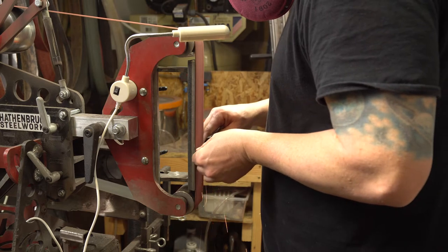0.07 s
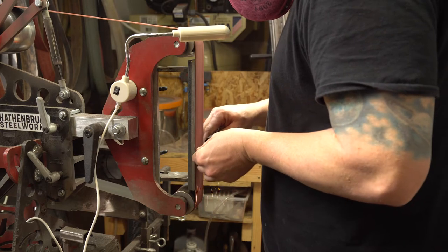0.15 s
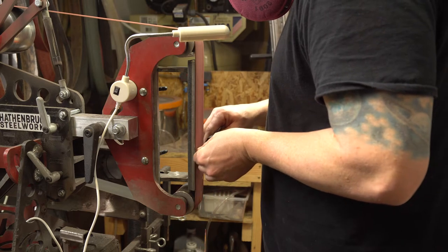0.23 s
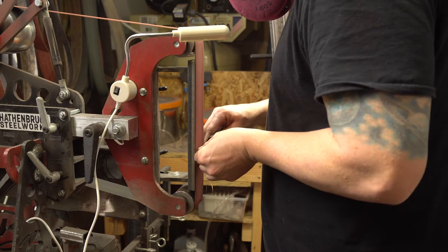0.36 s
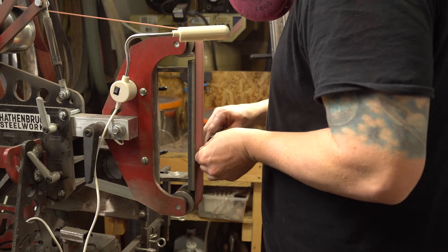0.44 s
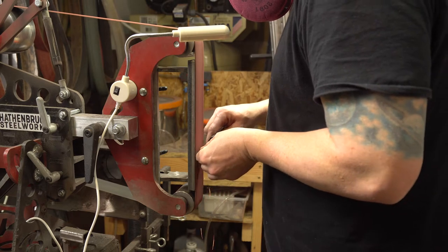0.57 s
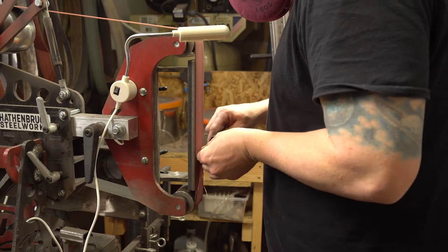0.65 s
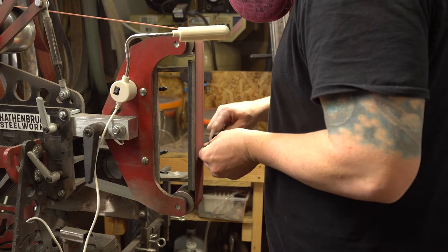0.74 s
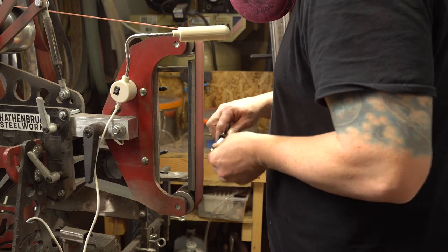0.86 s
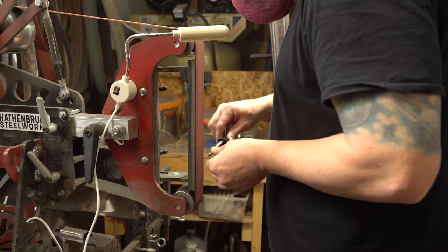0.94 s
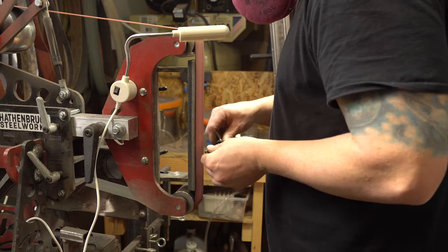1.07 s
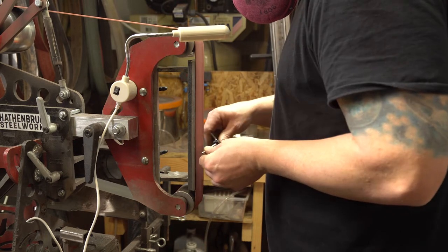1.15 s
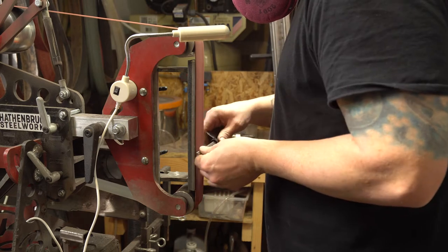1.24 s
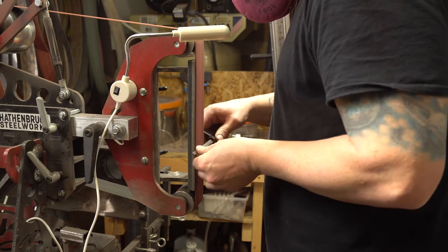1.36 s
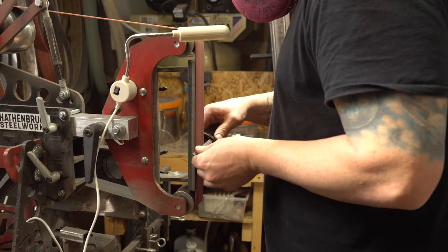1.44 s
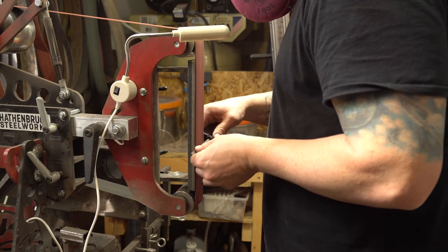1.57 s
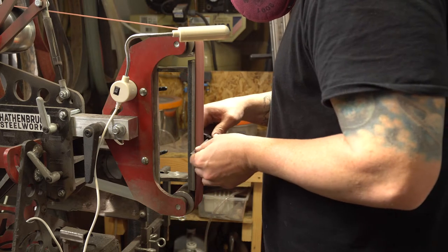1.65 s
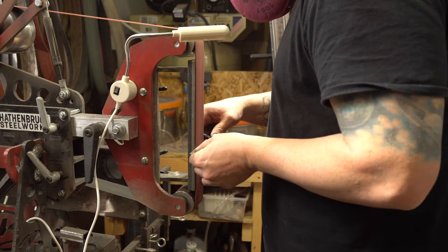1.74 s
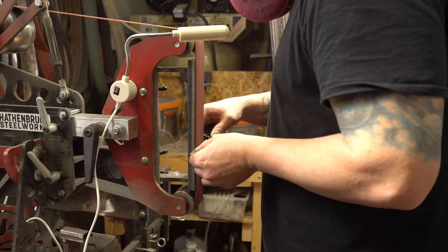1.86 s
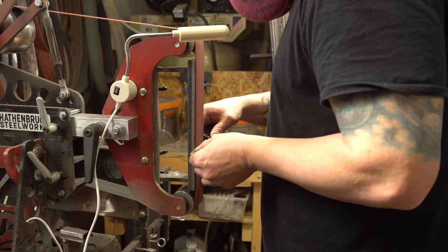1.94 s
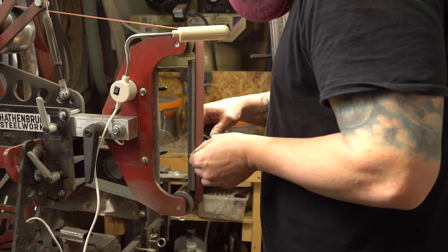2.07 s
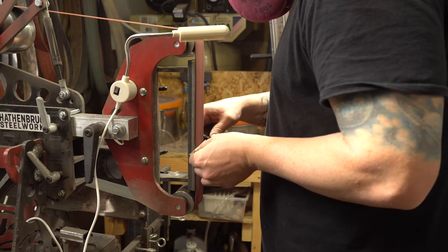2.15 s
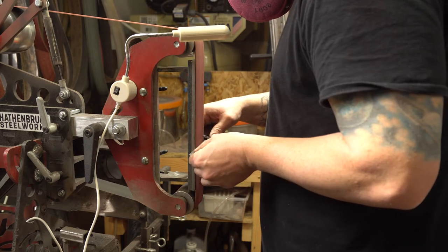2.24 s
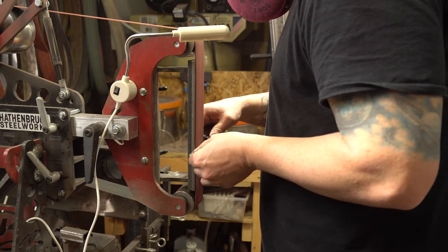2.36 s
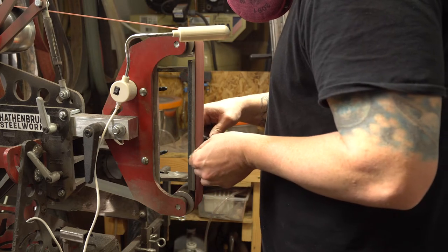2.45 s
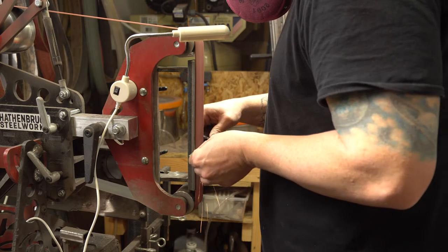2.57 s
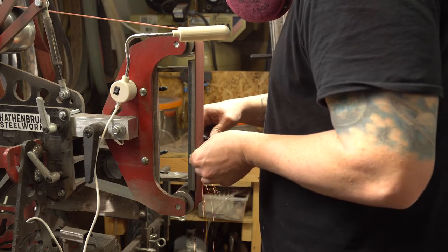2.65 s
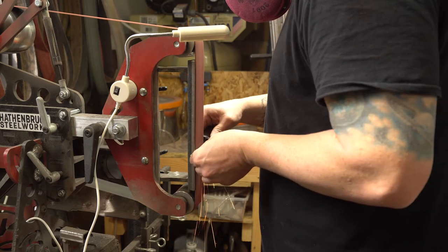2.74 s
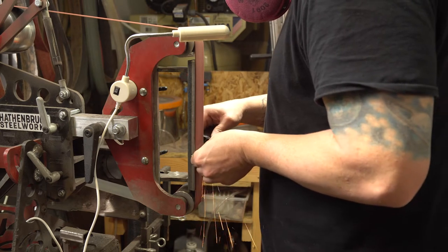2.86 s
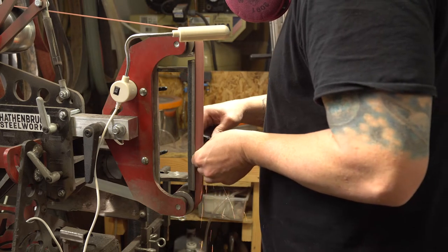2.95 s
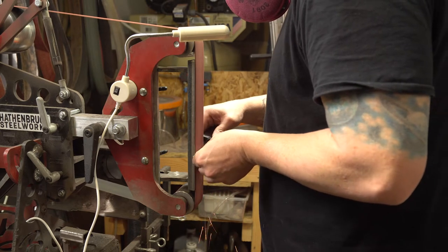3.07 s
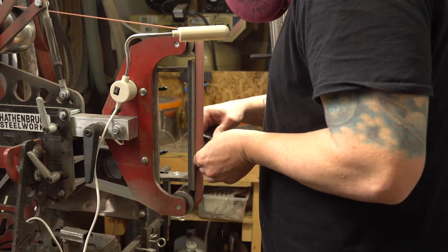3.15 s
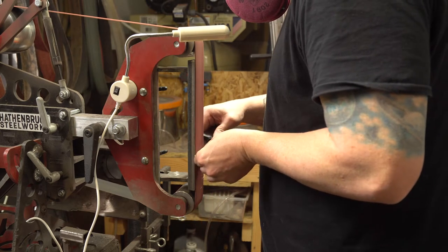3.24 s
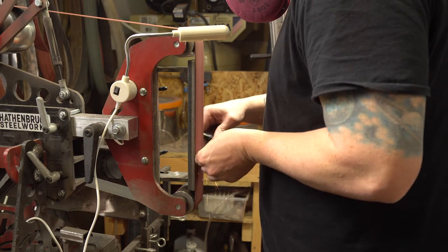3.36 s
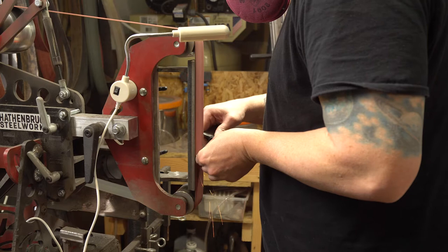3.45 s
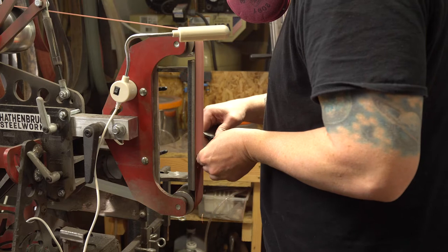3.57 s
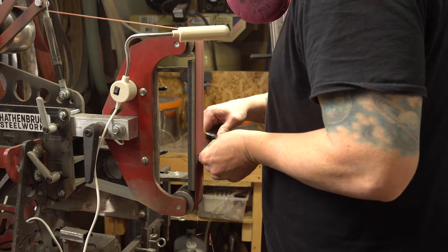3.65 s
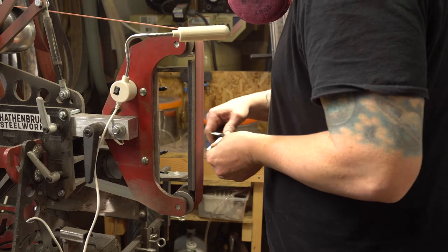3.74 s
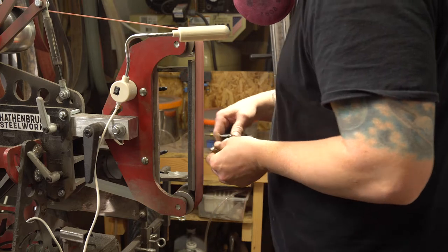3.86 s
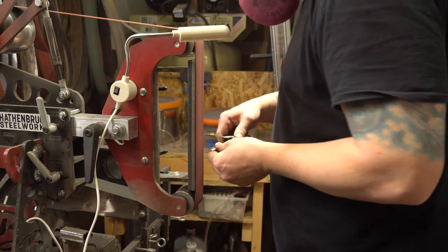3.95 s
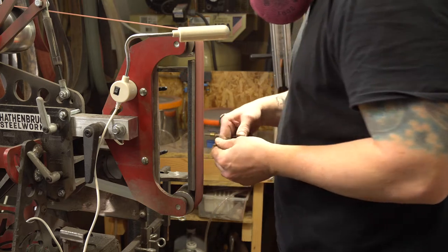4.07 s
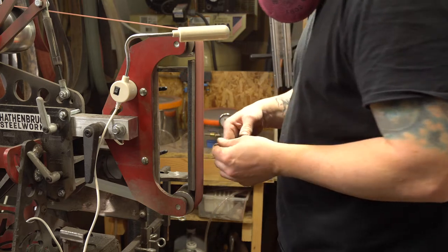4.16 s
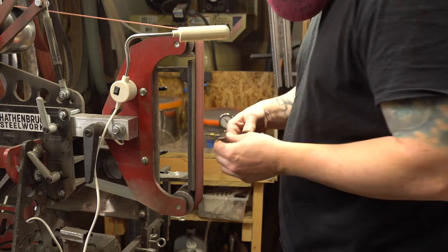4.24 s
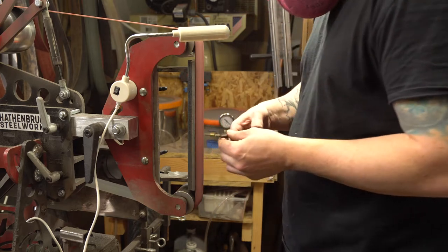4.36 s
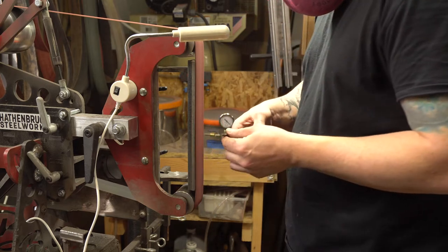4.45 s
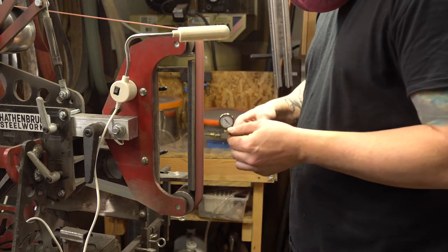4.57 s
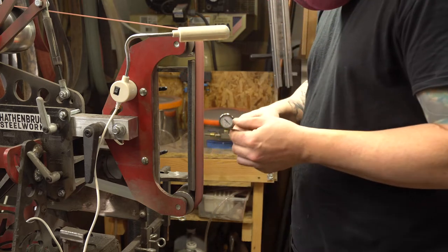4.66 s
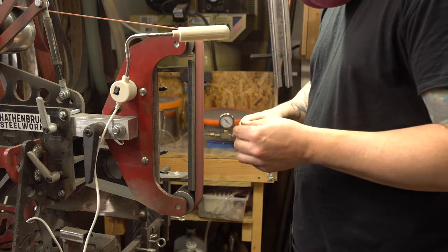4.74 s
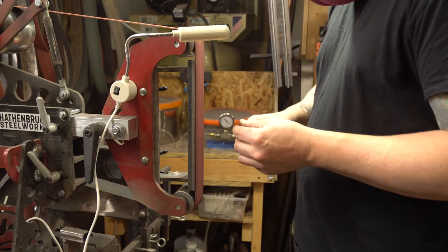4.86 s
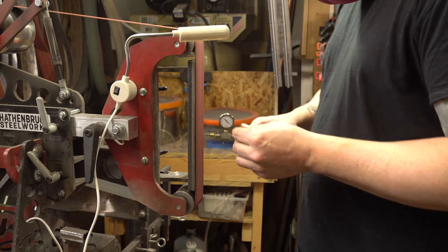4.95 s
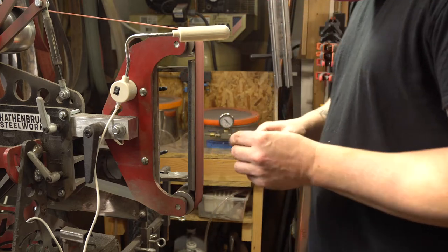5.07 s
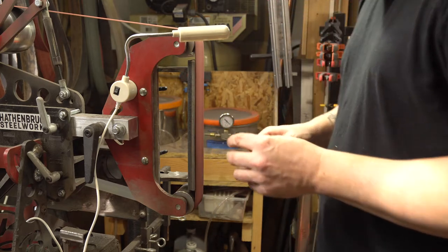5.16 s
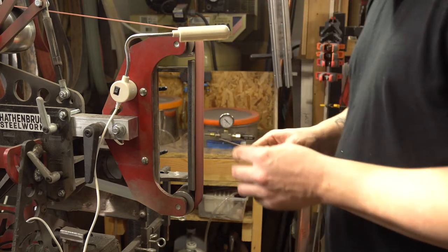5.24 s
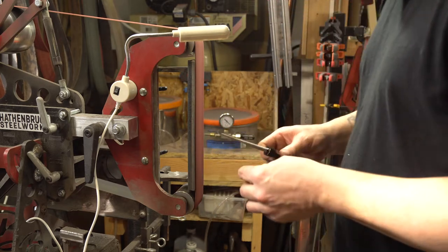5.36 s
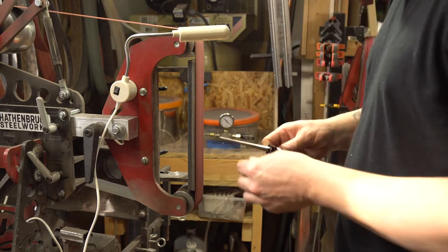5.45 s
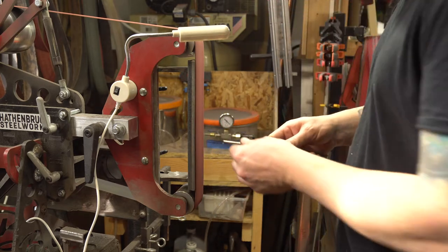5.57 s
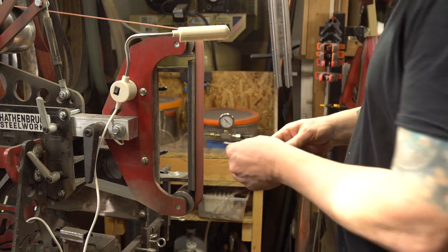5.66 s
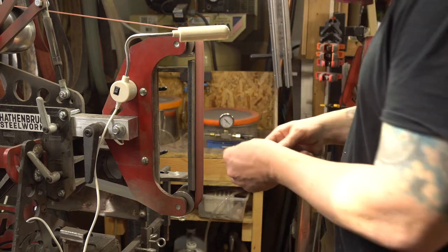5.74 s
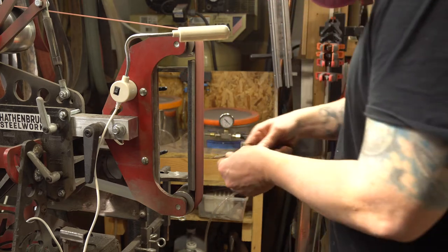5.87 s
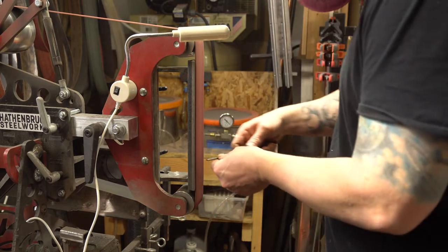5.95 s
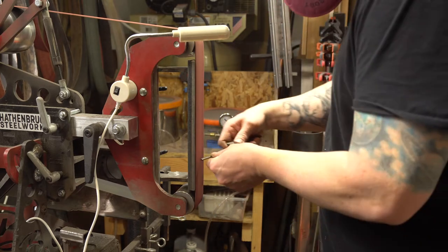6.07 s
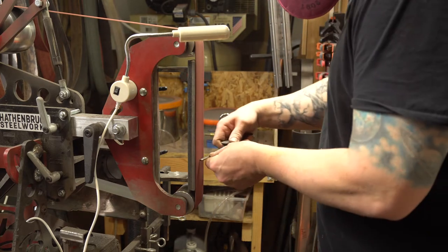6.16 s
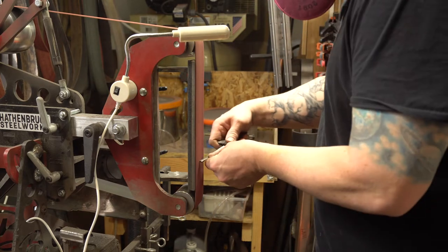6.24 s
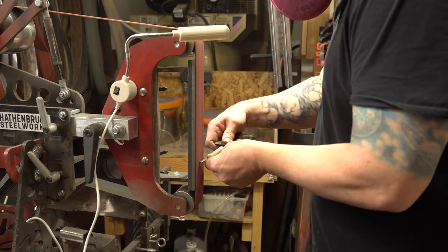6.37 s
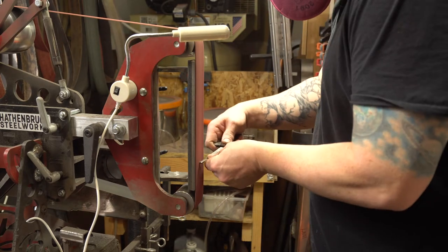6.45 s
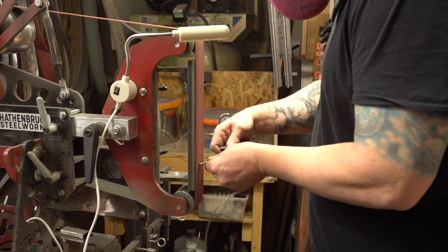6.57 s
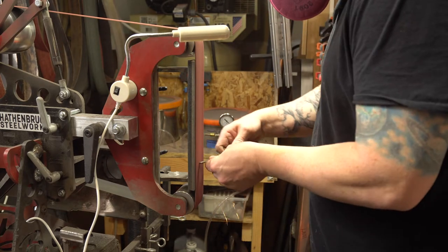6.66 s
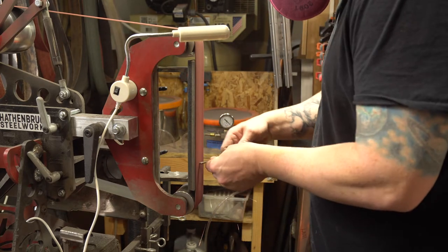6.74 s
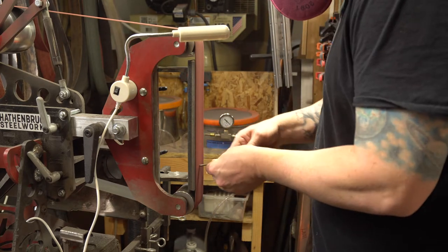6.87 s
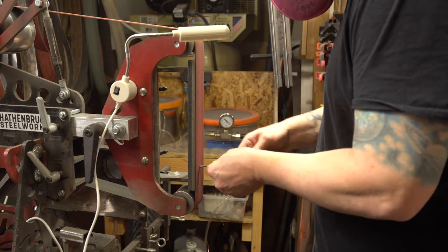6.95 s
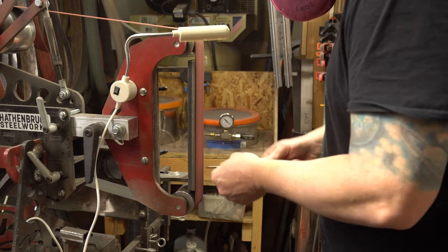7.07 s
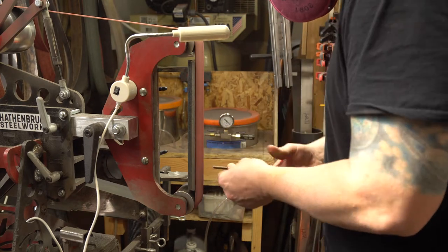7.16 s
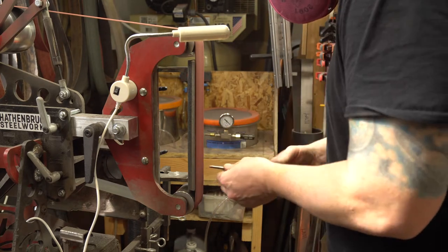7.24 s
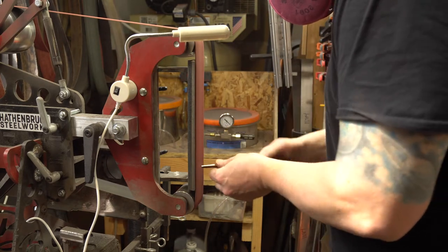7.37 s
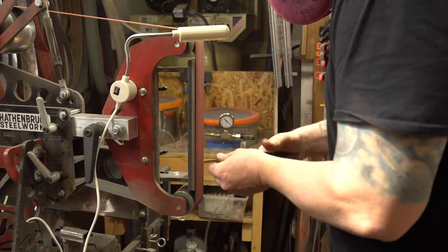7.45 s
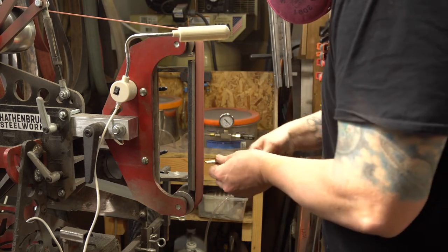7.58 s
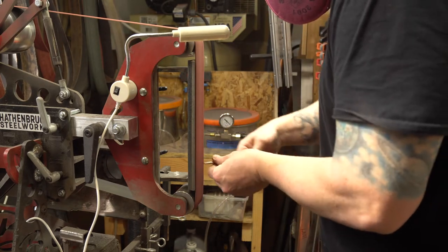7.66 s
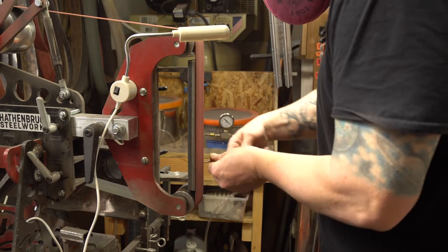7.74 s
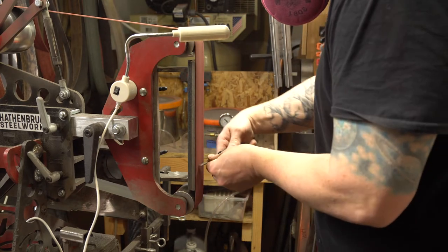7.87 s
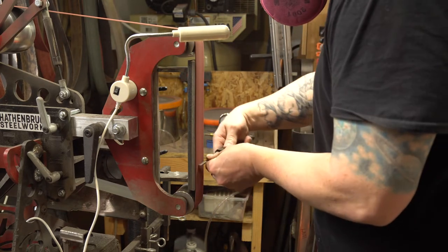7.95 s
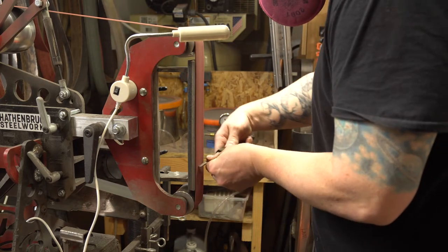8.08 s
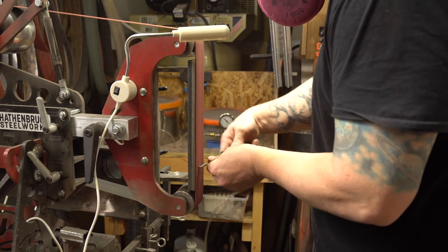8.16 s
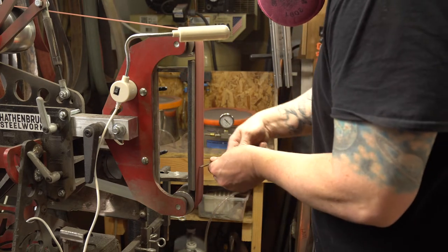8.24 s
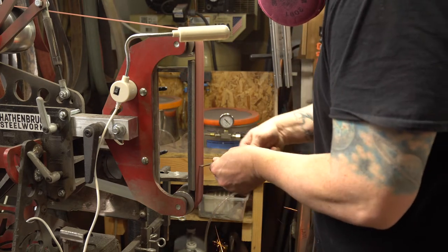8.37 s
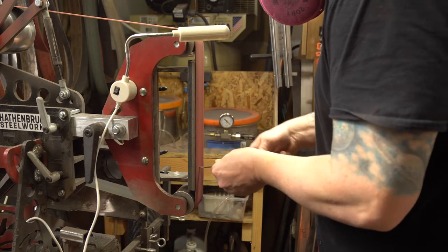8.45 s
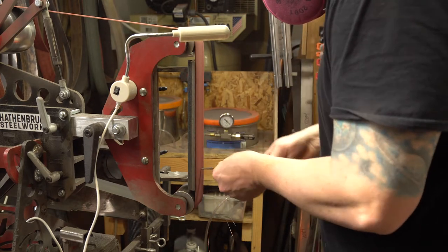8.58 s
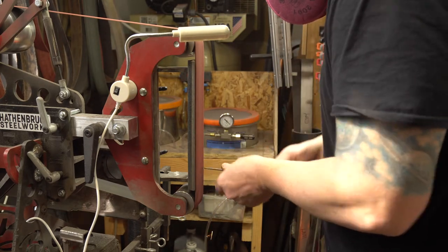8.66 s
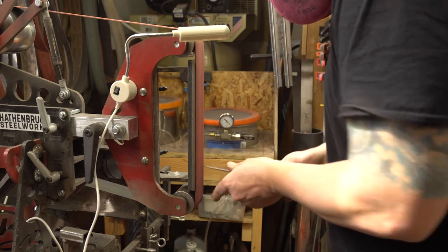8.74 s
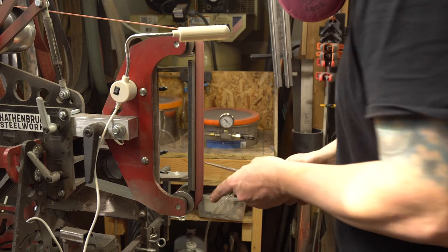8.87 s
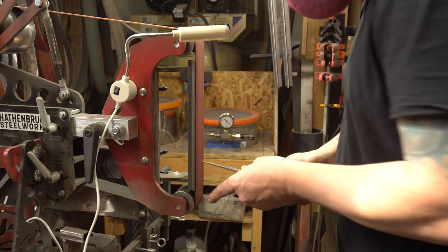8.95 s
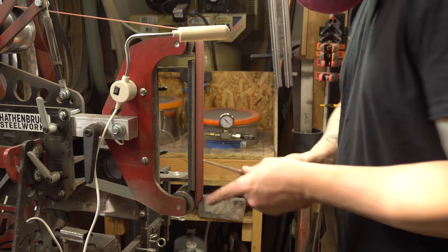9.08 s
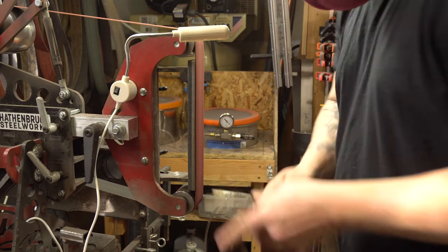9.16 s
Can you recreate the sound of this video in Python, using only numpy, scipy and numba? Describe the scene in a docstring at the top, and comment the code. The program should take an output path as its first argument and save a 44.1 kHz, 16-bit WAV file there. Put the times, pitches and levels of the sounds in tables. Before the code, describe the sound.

A belt grinder runs for the whole nine seconds in a workshop, about a metre away: a whirring rattle that repeats six or seven times a second, over a low hum and an airy hiss. From the very start a steel bar is grinding on the belt, a gritty, flickering, bright scrape that lifts off at 0.8 seconds. At about 1.9 seconds the bar touches again lightly, and the rasp builds, with a low rumble beneath it, until 3.7 seconds. The machine gets slightly faster and louder under the load. It then idles, its hiss taking on a gently sweeping, hollow colour as the worker moves. Two shorter passes follow, from 6.2 to 7.1 seconds and from 7.9 to 8.7 seconds, each swelling and easing, with the steel singing in a high metallic ring over the scrape. The grinder is still running at the end.

```python
"""Steel on a belt grinder

A belt grinder runs in a workshop, about a metre away. The belt's weave and grit come round once a turn
and force the frame into vibration, over the hum of the drive wheel and the hiss of dragged air.
A steel bar is pressed on four times, twice gripped near its tip and twice held far back, where it sings.
Hands and chest shade and reflect the treble, cancelling three bands that move with the worker."""
import sys
import numpy as np
from scipy import signal
from scipy.fft import rfft, irfft, next_fast_len
from scipy.io import wavfile
from scipy.ndimage import uniform_filter1d
from numba import njit

SR = 44100
rng = np.random.default_rng(int(sys.argv[2]) if len(sys.argv) > 2 else 0)


def bounce(signal):
    """Save signal as a 16-bit WAV file at the path given by the first command-line argument."""
    frames = np.transpose(np.atleast_2d(signal))
    limited = np.clip(frames, -1, 1)
    pcm = np.round(limited * 32767).astype(np.int16)
    wavfile.write(sys.argv[1], SR, pcm)


N = 406161

# Modes of the bar for each grip: pitch_hz, width_hz, level_db, db_per_bend, db_per_tilt
TIP_GRIP_MODES = [(413, 53, -26, 7.5, 3), (520, 21, -17, 6.5, 2.5), (663, 47, -17, 8, -1.7),
                  (760, 84, -17, 7, -3.5), (1183, 320, -13, 8, 0), (1690, 250, -11, 3, 1.5),
                  (1996, 100, -12.5, 5, 3.5), (2483, 120, -14, 1.5, -4), (2884, 21, -7, 3, 0.5),
                  (3195, 140, -7, 2.5, 0), (4100, 130, -6.5, 0, 1), (4870, 690, -6, 1.5, -1.5),
                  (8130, 320, -8, 0.2, 2.5), (8960, 90, -7.5, 0, 2), (10250, 520, -8.5, 3.5, 3),
                  (12040, 280, -3.5, 1.5, 2), (12940, 330, -8, -3.5, -1), (13600, 630, -2.5, 1, 0),
                  (15050, 510, -6, 2.5, 2)]
BACK_GRIP_MODES = [(305, 120, -28, 7, -7), (406, 43, -20.5, 5, -1.5), (540, 34, -18.5, 4.5, -0.5),
                   (740, 310, -18, 5, -3), (1733, 53, -6, 6.5, 1.5), (1863, 36, -7.5, 6.5, 1.5),
                   (2012, 52, -7, 5, 0), (2183, 150, -6.5, 5, -0.5), (2530, 560, -8, 8.5, -5),
                   (3223, 180, -6.5, 0, -2), (4915, 220, -3, -0.5, 0.5), (5800, 830, -3.5, 0.5, 1),
                   (6520, 290, -5, 2, 3.5), (7280, 890, -13.5, 6, -8.5), (8500, 230, -11.5, 7.5, -6),
                   (10520, 570, -10.5, 8, 7), (12020, 150, -8, -3, -1.5), (13500, 230, -10.5, 2, -2),
                   (15000.0, 860, -12.5, 0.0, -1)]
# Passes of the bar on the belt: grip, rows of (time_s, pressure_db, bend, tilt)
BAR_PASSES = [("tip", [(0, -15, 1.14, 1), (.2, -14, 0.87, .4), (.46, -12, 0.4, 0.93), (.7, -11.5, 0.15, 1),
              (.805, -10.5, -2.3, 1.1)]), ("tip", [(1.85, -27, -1.3, -1.8), (1.885, -29, -1.3, -1.8),
              (1.915, -42, -1.3, -1.8), (1.95, -29, -1.5, -1.8), (2.03, -22.5, -1.5, -1.8),
              (2.16, -23.5, -1.7, -1.6), (2.38, -18, -1, 0.43), (2.54, -17, -0.5, .8),
              (2.57, -17.5, 1, .45), (2.82, -16, 1.3, 0.56), (3.14, -14, 1, -1), (3.47, -11, 0.3, -1.5),
              (3.74, -12.5, 0.25, -1.6)]), ("back", [(6.24, -13.5, -1.7, 3), (6.4, -12, -0.86, 1.5),
              (6.62, -9, -0.036, 0.6), (6.73, -9, 0.25, -0.2), (6.95, -10.5, 1.46, .1),
              (7.11, -12.5, 1.5, -0.3)]), ("back", [(7.924, -14, -1.6, -1.3), (7.935, -20, -2.1, -1.4),
              (8.01, -19.5, -1.7, -1.6), (8.04, -14, -1.4, -2.2), (8.19, -15, -0.93, -1.6),
              (8.32, -9.5, .2, -0.19), (8.5, -11.5, 1, -0.092), (8.675, -14, 0.87, -0.59)])]
# Spectra of tearing grit and of the belt's low shove on the bar: frequency_hz, level_db
TEARING_SPECTRUM = [(900, -7), (2000, -2.5), (4000, 8), (7000, 5), (10000, 5), (13000, -4), (16000, -56.5)]
SHOVE_SPECTRUM = [(15, -9), (30, 3.5), (100, 2), (200, 0), (400, -55), (1000, -27)]
# Strength of the shove, by grip: level_db, db_per_pressure_db, db_per_bend
SHOVE_BY_GRIP = {"tip": (-11.5, 1.48, 3.5), "back": (-21.5, 1.04, 9.9)}
# Rise of belt speed in each pass: gain_turns_per_s, build_s
SPEED_RISES = [(.117, .001), (.13, 1.68), (.057, .65), (.035, 1)]
# Broad response of the frame: frequency_hz, level_db
FRAME_SPECTRUM = [(18, -65), (30, -32), (64, -26), (114, -9), (234, -14.5), (270, -20.5), (350, -9),
                  (552, -14.5), (592, -11.5), (808, -8.5), (910, -12.5), (1050, -5), (2730, -0.5),
                  (4610, -14), (9000, -19), (11700, -68), (19800, -120)]
# Frame modes, relative to that response: pitch_hz, width_hz, level_db
FRAME_RESONANCES = [(393, 53, -3.5), (549.5, 39, 6.5), (661, 8.2, -0.5), (772, 48, -0.5), (1502, 57, -5),
                    (1630, 16, -1), (1894, 48, -2), (1930, 17, -3), (1995, 25, 0), (2288, 19, 3),
                    (2295, 20, -8), (2554, 16, 6.5), (2774, 49, -4), (2900, 87, -5), (2957, 31, 2.5),
                    (3107, 22, 5), (3260, 31, 2)]
# Spectrum of the dragged air: frequency_hz, level_db
AIR_SPECTRUM = [(1500, -29), (3000, -0.5), (4000, 1.5), (5000, 0), (7500, 0.5), (10000, -1.5),
                (13000, -5.5), (16000, -13.5)]
# Partials of the drive wheel: harmonic_number, level_db
DRIVE_HARMONICS = [(1, -57), (2, -45.5), (3, -51), (4, -52), (5, -53), (6, -55.5)]
# The worker's stance as heard: time_s, lowest_notch_hz, reflection_strength, frame_db, hiss_top_db
WORKER_STANCE = [(0, 6400, 0.48, -17, 7), (.8, 6000, 0.56, -17.5, 2), (1.3, 5630, .5, -16.5, 5),
                 (1.8, 7050, 0.56, -16, 2.5), (2.2, 7100, .58, -16, 8.5), (3.2, 5900, 0.58, -16.5, 10),
                 (3.7, 6350, 0.56, -17.5, 3), (4.1, 5800, 0.4, -17.5, 3.5), (4.5, 5270, 0.64, -18, 3.2),
                 (5, 5000, .66, -18, 4), (5.3, 4470, 0.57, -18.2, 5.5), (5.7, 3720, .62, -18.5, 4),
                 (6.1, 3600, 0.67, -18.5, -8), (6.6, 3780, 0.57, -16.5, 5), (7.2, 3640, 0.44, -18, -1),
                 (7.9, 4000, 0.54, -18.5, -2), (8.4, 4100, 0.73, -17, -2), (8.75, 4250, 0.53, -17.7, 1),
                 (8.95, 4100, 0.4, -17.7, 3), (9.21, 3680, 0.47, -18, 1)]
# Cancelled bands: multiple_of_lowest, ceiling_hz, depth_share, share_per_octave_down
NOTCH_BANDS = [(1, 8000, 1.03, .01), (2.25, 11200, 0.75, 0.12), (3.35, 15500, .35, .6)]

IDLE_TURNS_PER_S, SLIP_TURNS, DRIVE_HZ = 6.623, .0003, 37.9
TOUCH_S, LIFT_S, CLEAR_DB, LIFT_UNBEND = .012, .019, -29, 1.5
FRAME_LOAD_DB, AIR_LOAD_DB = 17.5, 6  # per turn per second gained under load


def grinding_bar(grip, modes, turns, tearing_db, fresh_share):
    """Abrasion: grit tears at the steel and excites its modes, weighted by bending and tilt."""
    bite = undb(.9 * walk(30) + 2.2 * walk(600))  # grains bite unevenly, so the scrape flickers
    # only part of the roughness repeats each turn
    grit = mix(fresh_share, surface(turns, bumps=6600), rng.standard_normal(N))
    lumps = mix(fresh_share, surface(turns, bumps=6600), rng.standard_normal(N))
    tearing = unit(shape(bite * rng.standard_normal(N), TEARING_SPECTRUM))
    shove = unit(shape(lumps, SHOVE_SPECTRUM))
    shove_db, db_per_pressure, shove_db_per_bend = SHOVE_BY_GRIP[grip]
    out = np.zeros(N)
    for rows in (contact_path(rows) for held, rows in BAR_PASSES if held == grip):
        on = slice(max(int(rows[0][0] * SR), 0), int(rows[-1][0] * SR))
        pressure_db, bend, tilt = (curve[on] for curve in curves(rows))
        force = (bite * grit)[on]
        bar = undb(tearing_db) * tearing[on]
        for k, (hz, width_hz, level_db, db_per_bend, db_per_tilt) in enumerate(modes):
            wander_db = 1.53 * walk(7)[on]  # the contact spot never rests
            ring = unit(signal.lfilter(*signal.iirpeak(hz, hz / width_hz, SR), force))
            gain = undb(level_db + db_per_bend * bend + db_per_tilt * tilt + wander_db)
            bar += (-1) ** k * gain * ring  # neighbouring modes swing in opposite sense
        shove_gain = undb(shove_db + db_per_pressure * pressure_db + shove_db_per_bend * bend)
        out[on] = undb(pressure_db) * bar + shove_gain * shove[on]
    return out


def contact_path(rows):
    """Contact transients: pressure builds as the bar lands; pressure and bend fall as it lifts."""
    start_s, start_db, start_bend, start_tilt = rows[0]
    end_s, end_db, end_bend, end_tilt = rows[-1]
    landing = (start_s - TOUCH_S, start_db + CLEAR_DB, start_bend, start_tilt)
    lifting = (end_s + LIFT_S, end_db + CLEAR_DB, end_bend - LIFT_UNBEND, end_tilt)
    return [landing, *rows, lifting]


def belt_speed_gain():
    """Rate modulation: the belt gains turns per second in each pass and drops back quickly after."""
    t, gained = np.arange(N) / SR, np.zeros(N)
    for (_, rows), (gain, build_s) in zip(BAR_PASSES, SPEED_RISES):
        touch_s, lift_s = rows[0][0], rows[-1][0]
        rise = np.clip((np.minimum(t, lift_s) - touch_s) / build_s, 0, 1)
        drop = np.clip(1 - (t - lift_s) / .08, 0, 1)
        gained += gain * rise ** 2 * (3 - 2 * rise) * drop
    return gained


def frame_vibration(turns, upper_db, split_hz=2650, idler_ratio=5.115, idler_power=.07):
    """Forced vibration: the periodic roughness of belt, joint and idler drives the frame's modes."""
    # worn and fresh stretches of the belt swell and sink once a turn
    belt = surface(turns, bumps=6658) * undb(.8 * surface(turns, bumps=6))
    # the joint crosses a wheel twice a turn
    joint = sum(np.exp(-((turns - crossing) % 1) / .025) for crossing in (.235, .697))
    belt = belt + shape(joint * belt, modes=[(780, 200, 4), (1200, 600, 8)])
    idler = shape(surface(idler_ratio * turns, bumps=1302), modes=[(2200, 2500, 6)])
    roughness = belt + np.sqrt(idler_power) * idler
    broad = shape(mix(.04, roughness, rng.standard_normal(N)), FRAME_SPECTRUM)
    lower = shape(broad, modes=[mode for mode in FRAME_RESONANCES if mode[0] < split_hz])
    upper = shape(broad, modes=[mode for mode in FRAME_RESONANCES if mode[0] >= split_hz])
    return unit(broad + lower + undb(upper_db) * upper)


def air_hiss(top_db):
    """Flow noise: dragged air gives a wavering hiss, its top octave raised or lowered by top_db."""
    hiss = unit(shape(rng.standard_normal(N), AIR_SPECTRUM)) * undb(1.03 * walk(12))
    top = signal.sosfilt(signal.butter(2, 11500, "high", fs=SR, output="sos"), hiss)
    return hiss + (undb(top_db) - 1) * top


def drive_hum(turns):
    """Rotational harmonics: the drive wheel keeps step with the belt and hums at multiples of its rate."""
    spin = turns * DRIVE_HZ / np.median(np.gradient(turns) * SR)
    hum = np.zeros(N)
    for harmonic, level_db in DRIVE_HARMONICS:
        amplitude = np.sqrt(2) * undb(level_db + 1.1 * walk(5))
        hum += amplitude * np.sin(2 * np.pi * (harmonic * spin + rng.random()))
    return hum


def body_reflections(sound, lowest_hz, strength, octaves_down, relative_widths=(.5, .42, .5)):
    """Destructive interference: reflections from hands and chest cut three moving notches."""
    for (multiple, ceiling_hz, share, per_octave), width in zip(NOTCH_BANDS, relative_widths):
        hz = np.minimum(multiple * lowest_hz, ceiling_hz)
        # many small reflections never cancel fully
        depth = np.clip(strength * (share + per_octave * octaves_down), 0, .68)
        sound = sound - depth * moving_bandpass(sound, hz, width * hz)
    return sound


def surface(turns, bumps):
    """Periodic excitation: the same rough profile passes once a turn."""
    profile = signal.resample(rng.standard_normal(bumps), 4 * bumps)
    loop = np.append(profile, profile[0])
    return unit(np.interp(turns % 1 * len(profile), np.arange(len(loop)), loop))


def shape(x, spectrum=(), modes=()):
    """Superposition: a broad spectrum and resonances (pitch_hz, width_hz, level_db) filter in parallel."""
    size = next_fast_len(N)
    hz = np.arange(1, size // 2 + 2) * SR / size
    gain = sum(undb(db) / (1 + 1j * (hz / pitch - pitch / hz) * pitch / width)
               for pitch, width, db in modes)
    if len(spectrum):
        points_hz, points_db = np.transpose(spectrum)
        gain = gain + undb(np.interp(np.log(hz), np.log(points_hz), points_db))
    return irfft(rfft(x, size) * gain, size)[:N]


@njit
def moving_bandpass(x, hz, width_hz):
    """Second-order resonance: a state-variable filter with unit gain at its moving centre."""
    out, band_state, low_state = np.empty(len(x)), 0., 0.
    for i in range(len(x)):
        tuning, damping = np.tan(np.pi * hz[i] / SR), width_hz[i] / hz[i]
        band = (band_state + tuning * (x[i] - low_state)) / (1 + tuning * (tuning + damping))
        band_state, low_state = 2 * band - band_state, low_state + 2 * tuning * band
        out[i] = damping * band
    return out


def walk(rate_hz):
    """Random modulation: held values smoothed twice, with a spread somewhat under 1."""
    hold = int(SR / rate_hz)
    steps = np.repeat(rng.standard_normal(N // hold + 1), hold)
    return .98 * uniform_filter1d(uniform_filter1d(steps, hold), hold)[:N]


def mix(share, a, b):
    """Incoherent addition: unrelated sounds add in power, b weighted by share and a by the rest."""
    return np.sqrt(1 - share) * a + np.sqrt(share) * b


def curves(rows):
    """Linear interpolation of each column against the first, time_s."""
    time_s, *columns = np.transpose(rows)
    return [np.interp(np.arange(N) / SR, time_s, column) for column in columns]


def undb(db):
    """Amplitude ratio of a level in decibels."""
    return 10 ** (np.asarray(db) / 20)


def unit(x):
    """Normalisation to rms 1."""
    return x / np.sqrt(np.mean(x ** 2))


def scene():
    """Superposition: machine and bar add, then interfere with their reflections from the worker."""
    gained = belt_speed_gain()
    turns = np.cumsum(IDLE_TURNS_PER_S + gained) / SR + SLIP_TURNS * walk(2)
    notch_hz, strength, frame_db, hiss_top_db = curves(WORKER_STANCE)
    octaves_down = np.log2(6000 / notch_hz)
    upper_db = 3 - 3 * octaves_down  # the upper frame modes are shaded as the worker steps back
    frame = undb(frame_db + FRAME_LOAD_DB * gained) * frame_vibration(turns, upper_db)
    air = undb(-17.3 + AIR_LOAD_DB * gained) * air_hiss(hiss_top_db)
    sound = frame + air + drive_hum(turns)
    sound += grinding_bar("tip", TIP_GRIP_MODES, turns, tearing_db=4.5, fresh_share=.45)
    sound += grinding_bar("back", BACK_GRIP_MODES, turns, tearing_db=0, fresh_share=.8)
    sound = body_reflections(sound, notch_hz, strength, octaves_down)
    return np.array([sound, sound])


def record(dry, threshold_db=-13, cutoff_hz=15770):
    """Compression: quick gain control eases loud moments, then peaks are rounded and the top is cut."""
    rms = np.sqrt(uniform_filter1d(dry ** 2, size=400))
    compressed = dry * np.minimum(1, undb(threshold_db) / rms) ** .45
    rounded = np.tanh(1.05 * compressed) / 1.05
    return signal.sosfilt(signal.ellip(14, .3, 85, cutoff_hz, fs=SR, output="sos"), rounded)


dry = scene()
out = record(dry)
bounce(out)
```